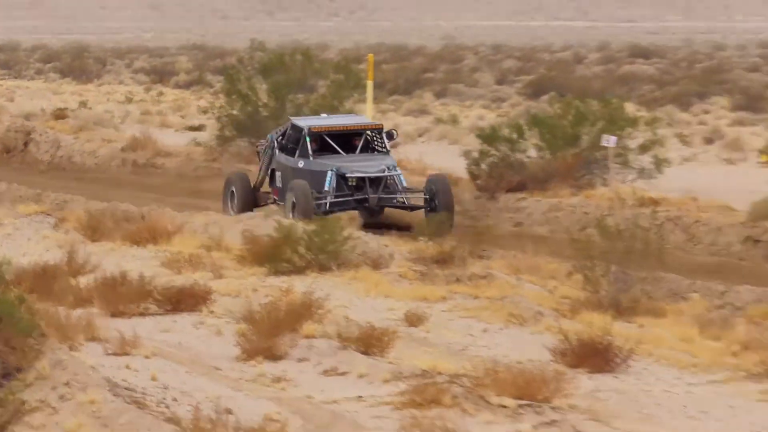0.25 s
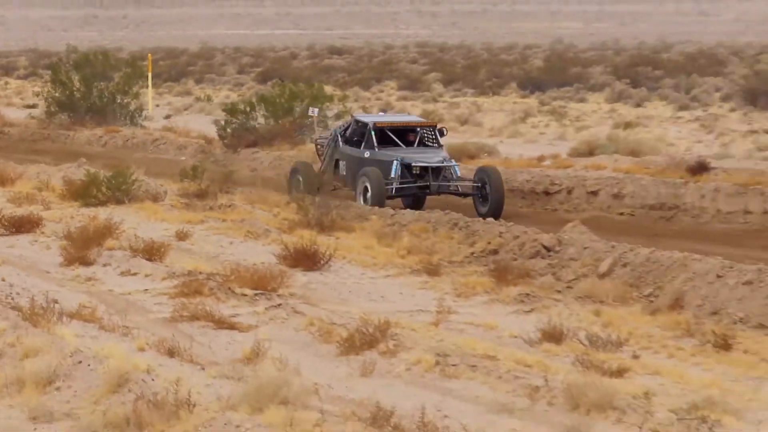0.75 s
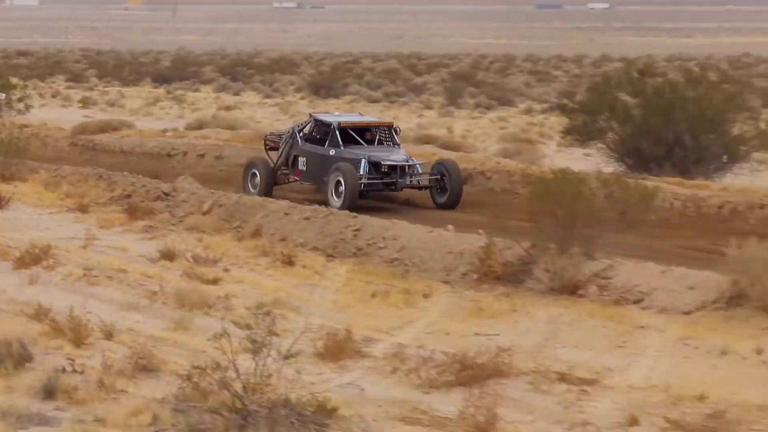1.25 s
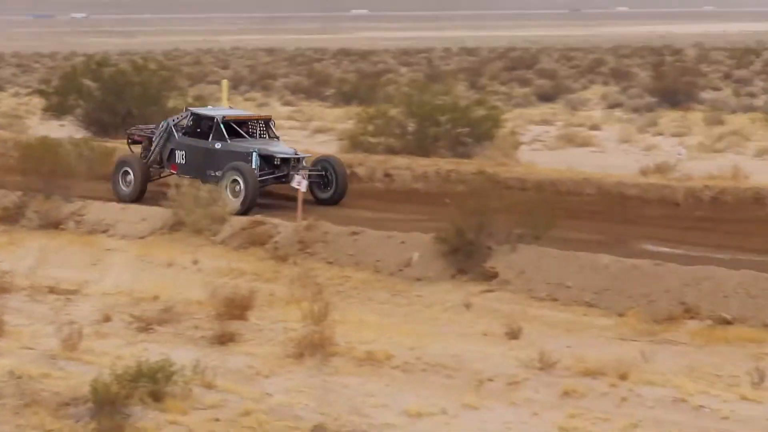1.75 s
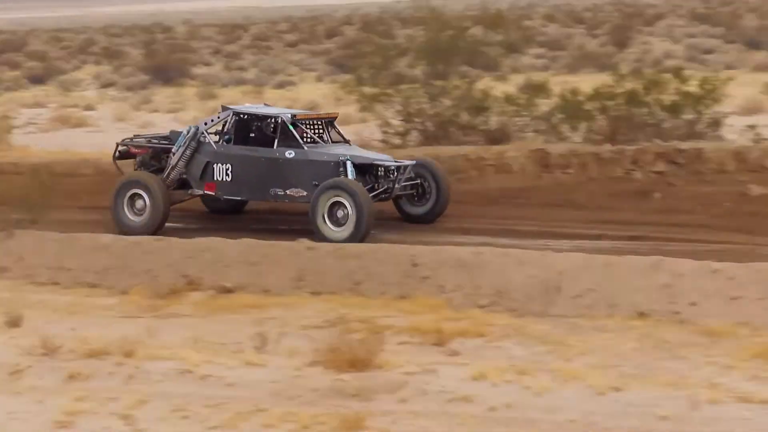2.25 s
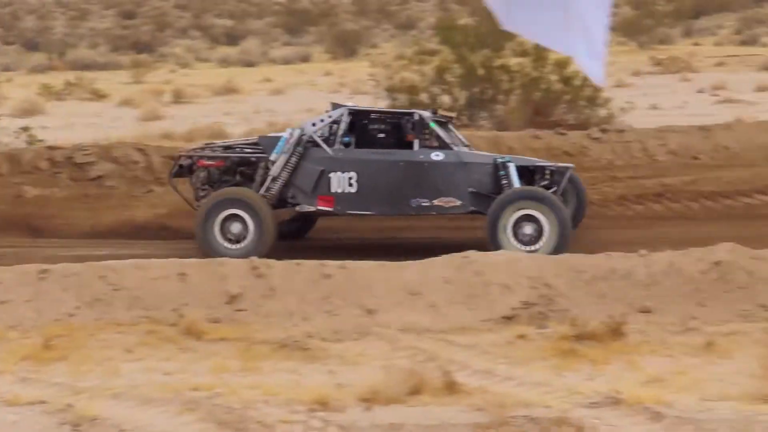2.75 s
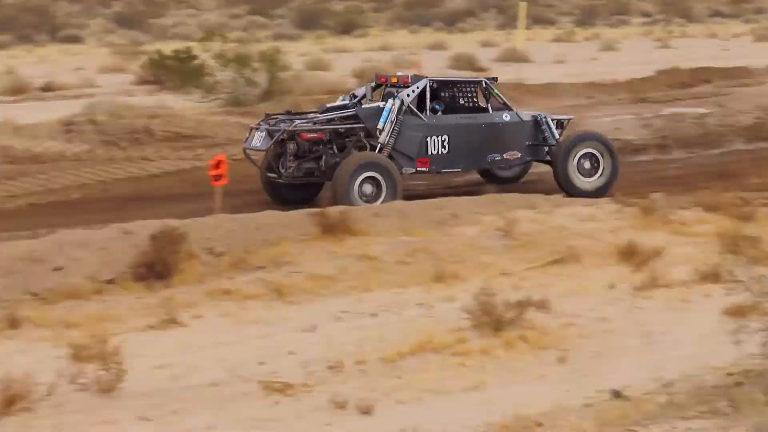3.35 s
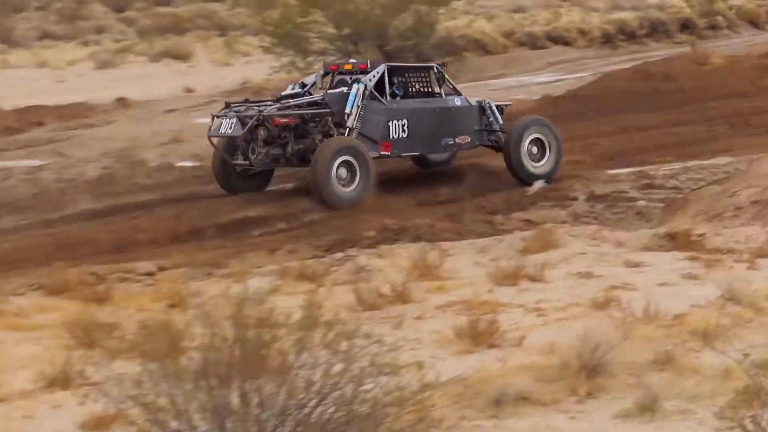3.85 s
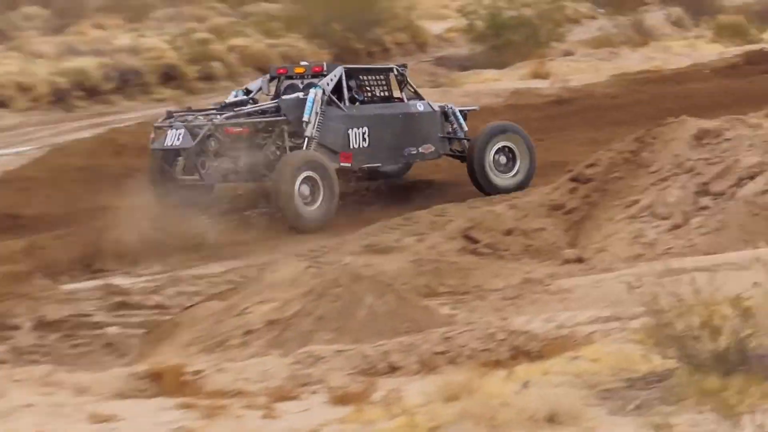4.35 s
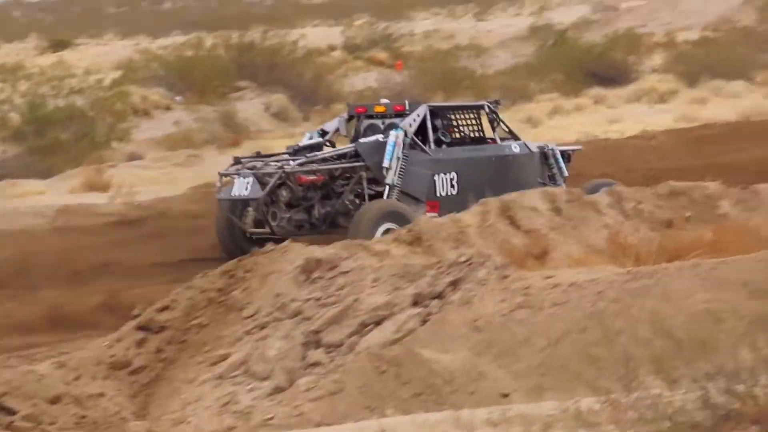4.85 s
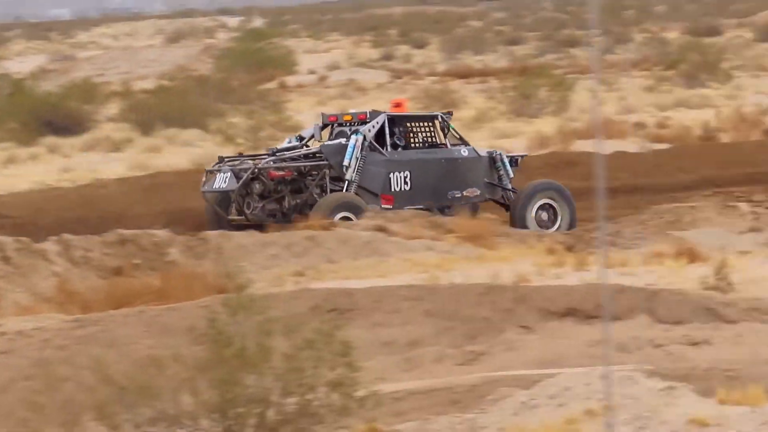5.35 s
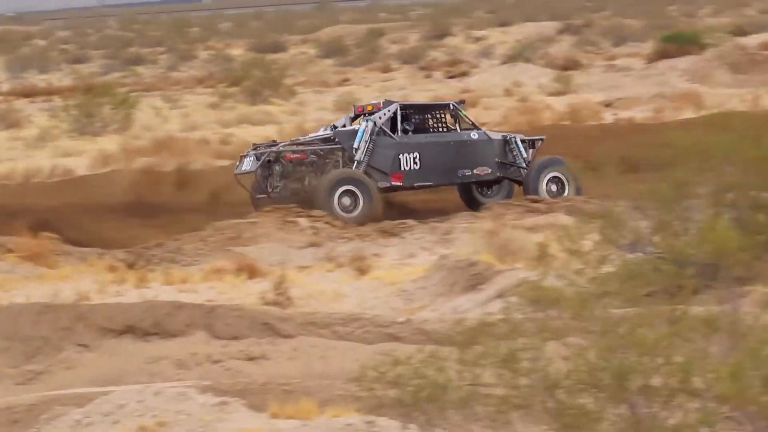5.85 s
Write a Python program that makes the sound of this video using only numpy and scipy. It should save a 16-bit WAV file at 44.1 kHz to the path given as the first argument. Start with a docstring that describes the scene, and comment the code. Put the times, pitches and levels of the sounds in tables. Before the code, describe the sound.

A race buggy's open four-cylinder exhaust, dry and central in open desert, never stops. At 0 s it is a high, hollow, rough drone near 200 Hz, sliding down with small pops at 0.2 and around 0.65-0.85 s. Near 1 s the revs dip and flick upward, and from 1.1 s the bark hardens; sharp pops hit around 1.5 s. From 1.6 to 2.5 s it passes with a steady, loud, uneven buzzing rasp, with low wind buffeting around 2.45 s. Quick lifts gulp the sound at 2.6 and 2.95 s. Revs sag, with thumping pops at 3.35 s and a stuttering crackle burst at 3.6 s, reaching a low growl near 130 Hz at 4 s. After a short cut at 4.35 s, throttle returns strongly, snarling by 4.8 s. It fades and dips at 5.27 s, crackles at 5.55 s, climbs with a rasp to about 5.95 s, then drops slightly and ends mid-run.

```python
"""Race buggy on a desert track

A four-cylinder buggy passes, its driver lifting off and getting back on the throttle. The open exhaust
sings a firing note and its octave, two sines. Clicks at each firing ring pipe resonances and set off
puffs of noise: bark, rasp and crackle, with thumps where the cylinders fire unevenly. Roar, rumble
and wind are shaped noise, and single hard firings pop out after stumbles."""
import sys
import numpy as np
from scipy import signal
from scipy.fft import rfft, irfft
from scipy.io import wavfile
from scipy.ndimage import uniform_filter1d

SR = 44100
rng = np.random.default_rng(int(sys.argv[2]) if len(sys.argv) > 2 else 0)


def persist_wave(psi):
    """Save psi, clipped to +-1, as 16-bit WAV."""
    counts = np.round(np.clip(psi, -1, 1) * 32767).astype(np.int16)
    wavfile.write(sys.argv[1], SR, np.atleast_2d(counts).T)


N = 269010   # length in samples

# Engine speed before bumps: time_s, firings_hz
REVS = [(0, 209), (.3, 202), (.6, 181.5), (.74, 176), (.8, 167), (.99, 161), (1.2, 176), (1.55, 183),
        (1.7, 182), (1.9, 175.5), (2.1, 174.5), (2.57, 165), (2.79, 175.5), (2.9, 171), (3.0, 162.5),
        (3.18, 153.5), (3.4, 150.5), (4.0, 128.3), (4.18, 134.3), (4.4, 134), (4.57, 147.6), (4.69, 149.5),
        (4.83, 172.5), (5.08, 168.5), (5.26, 153), (5.33, 160.5), (5.49, 165.5), (5.84, 180.4),
        (5.98, 190.5), (6.05, 172.6), (6.1, 171.5)]
# A bump unloads or loads the wheels, so the revs flare or sag: peak_s, change_hz, half_length_s
BUMPS = [(1.075, 24, .06), (1.27, -8, .07), (4.91, -11, .055), (5.565, 8, .06)]
# Evenness of running: time_s, turbulent share of pipe tone (0-1), of rasp (0-1), loudest_cylinder_lead_db
RUNNING = [(0, .8, .9, 4), (1.35, .7, .75, 3), (1.6, .25, .5, 3), (1.75, .25, .45, 4), (1.85, .22, .3, 11),
           (2.52, .25, .35, 10), (2.6, .04, .4, 2), (2.95, .04, .4, 2), (3.1, .22, .65, 3),
           (3.6, .4, .7, 4), (3.75, .15, .65, 3), (4.1, .08, .65, 3), (4.45, .06, .55, 3), (4.9, .1, .6, 3),
           (6.1, .07, .38, 1)]
# Share of that lead for each cylinder, in firing order: share (no unit)
CYLINDER_SHARES = [-.3, 1, -.2, 0]
# The driver lifts off for a moment: deepest_s, closing_s, opening_s, note_drop_db, bark_drop_db
LIFTS = [(.97, 0.15, 0.09, 0.5, 16), (1.26, 0.04, 0.045, 1.5, 6.5), (2.588, 0.057, 0.09, 17.5, 13),
         (2.953, .05, 0.092, 15, 14), (4.35, 0.077, 0.11, 19.5, -1.5), (5.271, .1, 0.1, 2, 24.5)]
# Firing note before throttle lifts: time_s, level_db
NOTE = [(0, -19), (.3, -22.5), (.45, -16), (.75, -9), (.85, -12.5), (1.03, -13), (1.2, -10), (1.7, -9),
        (2.55, -10), (2.75, -15), (2.9, -13), (3.23, -20), (3.45, -12.5), (4.08, -17), (4.16, -30),
        (4.3, -21.5), (4.5, -7), (4.8, -14.5), (5.15, -18), (5.25, -22.5), (5.52, -23.5), (5.62, -18.5),
        (5.86, -17), (5.96, -22), (6.1, -19.5)]
# Exhaust rasp under load, before throttle lifts: time_s, rasp_db
BARK = [(0, -47), (.2, -47.5), (.33, -57), (.8, -37), (1.07, -31), (1.45, -29.5), (2.0, -26.5), (2.52, -28),
        (2.7, -36), (2.9, -31.5), (3.1, -40.5), (3.3, -39), (3.37, -34.5), (3.48, -38.5), (3.6, -35),
        (3.9, -40.5), (4.13, -50.5), (4.42, -45), (4.5, -29.5), (4.8, -23.5), (5.0, -33), (5.16, -37.5),
        (5.4, -37), (5.7, -36.5), (5.84, -27.5), (6.1, -43)]
# Colour of the bark as the car swings past, each against the rasp:
# time_s, note_octave_db, pipe_low_db, pipe_middle_db, crackle_db
BEARING = [(0, 0, 1.5, 5.5, -37), (.33, 11, 12, 8, -14.5), (.8, -6, -4, -6.5, -38.5),
           (.95, 8.5, -4, -4, -27), (1.07, -9.5, -9, -7, -31), (1.27, -3, -9.5, -0.5, -29),
           (1.6, -17, -5, -6, -35.5), (2.5, -18, -12, -1, -20.5), (2.58, -5, -0.5, -6, -27.5),
           (2.7, -17.5, -1.5, 16, -23.5), (2.92, -7, 1, 7.5, -26), (3.1, 9, -4, 2, -17.5),
           (3.5, 3.5, 1, -3, -23.5), (3.9, 6.5, 1.5, -2.5, -24), (4.15, -5, 6.5, -8.5, -16.5),
           (4.42, 9.5, 17.5, 0.5, -16), (4.55, 6, 3.5, 2, -36.5), (4.82, -2.5, -4.5, 2, -35),
           (5.2, 1, 9, 5.5, -32.5), (5.7, 6.5, 5.5, 7, -31), (5.86, -5, 5, -2, -23), (6.1, 10, 8.5, 5, -24)]
# Bursts (or one dip) of crackle: peak_s, rise_db, half_length_s
BURSTS = [(0.227, 4, 0.045), (3.373, 9.5, 0.035), (3.556, 17.5, 0.083), (3.678, 11.5, 0.055),
          (4.485, 9.5, 0.026), (4.693, -7, 0.048), (5.543, 17, 0.064), (5.803, 10.5, 0.022)]
# Low end: time_s, uneven_thumps_db (before stumbles), side_wind_db
LOWS = [(0, -31.5, -63), (.9, -30.5, -67), (1.4, -24.5, -56), (1.6, -32.5, -57), (2.1, -37, -54),
        (2.45, -28.5, -29.5), (2.7, -36, -58), (3.2, -30, -77), (3.8, -38.5, -81), (4.45, -33, -71),
        (5.2, -41.5, -71), (5.64, -41.5, -73), (6.1, -47, -77)]
# Single hard firings after a stumble: time_s, crack_db, low_push_db
POPS = [(0.208, -29, -28), (0.648, -35, -30), (0.67, -27, -17), (0.692, -25, -26), (0.828, -21, -29),
        (0.854, -36, -16), (1.138, -19, -21), (1.497, -11, -13), (1.54, -15, -18), (3.33, -19, -12),
        (3.359, -39, -14), (3.383, -18, -9), (3.602, -15, -10), (3.616, -24, -10), (3.631, -18, -16),
        (3.644, -28, -18), (3.659, -27, -13.5), (3.672, -22, -12.5), (4.063, -29, -26), (4.082, -24, -32)]

# Exhaust resonances, levels relative within a bank: centre_hz, width_hz (of each pass), level_db
THUMP_MODES = [(97, 150, -4), (197, 82, 5)]
LOW_MODES = [(551, 170, -2.5), (726, 75, -7)]
MIDDLE_MODES = [(914, 220, 2), (1100, 100, -8)]
RASP_MODES = [(1462, 410, 21.1), (2153, 530, 12.8)]
EDGE_MODES = [(2630, 2350, -1.8), (3500, 920, -0.15)]
CRACKLE_MODES = [(5000, 5000, 9), (7900, 2100, 2), (11400, 16000, -6.5)]
PUSH_MODES = [(188, 78, 0)]

# Relative spectrum of the broad roar: frequency_hz, density_db (per Hz)
ROAR = [(30, -15), (100, -20.5), (250, -20), (900, -9.5), (1600, -17), (3300, -30.5), (9000, -56)]
# Relative spectrum of the roar scattered sideways: frequency_hz, density_db (per Hz)
SCATTER = [(300, -17.5), (900, -11), (2700, -10), (4500, -29.5), (9000, -48.5)]

MUFFLE_HZ = 2587   # low, middle and rasp fall off steeply above
EDGE_DB = -1.5   # 3-4 kHz edge, against the mean of rasp and crackle in dB
CRACKLE_DROPS, PIPE_HOLDS = .44, .48   # shares of a lift's drop: crackle follows, low registers escape
STUMBLE_DB, STUMBLE_S = 7.5, .046   # swell of thumps and rumble around a hard firing, half length
POP_SPIT_DB = -27   # treble spit, against the crack
ROAR_DB, ROAR_FOLLOWS = -38, .4   # roar at mean rasp level; share of the rasp's swing it follows
RUMBLE_DB, RUMBLE_SIDE_DB = -10, -21   # rumble against the thumps; its side part against the rumble
WIDE_DB, SCATTER_DB = -10, -58   # side crackle against the middle; scattered roar at mean loudness
LEFT_DB = .12   # left is raised and right lowered by this much
CUTOFF_HZ = 15700   # the top is 70 dB down from here


def from_db(db):
    """Decibels to an amplitude factor."""
    return 10 ** (np.asarray(db) / 20)


def in_time(rows):
    """Each column of a table as a straight-line curve over the scene."""
    s, *columns = np.transpose(rows)
    return [np.interp(np.arange(N) / SR, s, column) for column in columns]


def swells(rows):
    """Sum of ramps up to a peak and down again, rows of (peak s, rise s, fall s, height)."""
    t = np.arange(N) / SR
    return sum(np.interp(t, [s - rise_s, s, s + fall_s], [0, height, 0])
               for s, rise_s, fall_s, height in rows)


def even(x, span_s=.067):
    """Hold the level near rms 1 over a short span."""
    size = int(span_s * SR)
    power = uniform_filter1d(uniform_filter1d(x ** 2, size=size), size=size)
    return x / np.sqrt(power + 1e-20)


def resonate(x, modes):
    """Parallel resonances run forwards and backwards: steep flanks, all peaking together in one spike."""
    out = 0
    for hz, width_hz, level_db in modes:
        r = np.exp(-np.pi * width_hz / SR)
        b = (1 - r * r) / 2 * np.array([1, 0, -1])
        a = [1, -2 * r * np.cos(2 * np.pi * hz / SR), r * r]
        forward = signal.lfilter(b, a, x + 1e-18)
        out = out + from_db(level_db) * signal.lfilter(b, a, forward[::-1])[::-1]
    return out


def struck(hits, modes):
    """Resonances scaled so that a unit click peaks at 1."""
    unit_ring = resonate(signal.unit_impulse(2000, "mid"), modes)
    return resonate(hits, modes) / np.max(np.abs(unit_ring))


def coloured(spectrum):
    """Noise with the given spectrum, rms 1."""
    hz, level_db = np.transpose(spectrum)
    bins_hz = np.maximum(np.arange(N // 2 + 1) * SR / N, 1)
    gain = from_db(np.interp(np.log(bins_hz), np.log(hz), level_db))
    x = irfft(rfft(rng.standard_normal(N)) * gain, N)
    return x / np.std(x)


def low_noise(low_hz, high_hz):
    """Band of bass noise, evened to rms 1."""
    band = signal.butter(3, [low_hz, high_hz], "band", fs=SR, output="sos")
    return even(signal.sosfilt(band, rng.standard_normal(N)), span_s=.29)


def engine_turns():
    """Running count of firings: engine speed plus bumps, summed over time."""
    bumps_hz = swells([(s, half_s, half_s, hz) for s, hz, half_s in BUMPS])
    return np.cumsum(in_time(REVS)[0] + bumps_hz) / SR


def firings(turns, scatter_db, lead_scale, lag, jitter_s):
    """One suction click per firing: cylinder pattern plus chance, which grows with turbulence; lag in firings."""
    rough, _, lead_db = in_time(RUNNING)
    at = np.flatnonzero(np.diff(np.floor(turns - lag)) > 0)
    chance = rng.standard_normal((1500, 2))[:len(at)]
    cylinder = np.array(CYLINDER_SHARES)[np.arange(len(at)) % 4]
    level_db = lead_scale * lead_db[at] * cylinder + scatter_db * rough[at] * chance[:, 0]
    shifted = at + np.round(jitter_s * SR * rough[at] * chance[:, 1]).astype(int)
    clicks = np.zeros(N)
    clicks[np.clip(shifted, 0, N - 1)] = -from_db(level_db)
    return clicks


def registers():
    """Levels in dB of octave, pipe low, pipe middle, rasp and crackle: load, less lifts, coloured by bearing."""
    lift_db = swells([(s, closing_s, opening_s, db) for s, closing_s, opening_s, _, db in LIFTS])
    rasp_db = in_time(BARK)[0] - lift_db
    octave_db, low_db, middle_db, crackle_db = rasp_db + in_time(BEARING)
    burst_db = swells([(s, half_s, half_s, db) for s, db, half_s in BURSTS])
    crackle_db = crackle_db + (1 - CRACKLE_DROPS) * lift_db + burst_db
    back_db = PIPE_HOLDS * lift_db
    return octave_db + back_db, low_db + back_db, middle_db + back_db / 2, rasp_db, crackle_db


def firing_note(turns, octave_db):
    """The exhaust sings one cycle per firing, with its octave above; levels are rms."""
    note_db = in_time(NOTE)[0] - swells([lift[:4] for lift in LIFTS])
    note = np.sqrt(2) * from_db(note_db) * np.cos(2 * np.pi * turns)
    return note + np.sqrt(2) * from_db(octave_db) * np.cos(4 * np.pi * turns - .6)


def thump_level():
    """Level of the uneven thumps in dB, raised wherever a hard firing is near."""
    near = swells([(s, STUMBLE_S, STUMBLE_S, 1) for s, *_ in POPS])
    return in_time(LOWS)[0] + STUMBLE_DB * np.minimum(near, 1)


def uneven_thumps(turns, thump_db):
    """Differences between cylinders' firings ring the low resonances."""
    uneven = firings(turns, scatter_db=3.5, lead_scale=.13, lag=.92, jitter_s=0)
    # only the departure from the mean firing thumps; the mean is the note itself
    uneven[uneven != 0] -= np.mean(uneven[uneven != 0])
    return from_db(thump_db) * even(resonate(uneven, THUMP_MODES), span_s=.15)


def bark(clicks, modes, puff_s, share):
    """Clean clicks and the turbulent puff of gas after each, through the same resonances; rms about 1."""
    r = np.exp(-1 / (puff_s * SR))
    puffs = signal.lfilter([1], [1, -r], clicks) * rng.standard_normal(N)
    clean = np.sqrt(1 - share) * even(resonate(clicks, modes))
    return clean + np.sqrt(share) * even(resonate(puffs, modes))


def pipe_bark(turns, steady, levels):
    """Each firing barks through the pipe: low, middle and rasp are muffled, the edge above is not."""
    _, low_db, middle_db, rasp_db, crackle_db = levels
    tone_share, rasp_share, _ = in_time(RUNNING)
    sharp = firings(turns, scatter_db=1.5, lead_scale=1, lag=.625, jitter_s=.00005)
    pipe = from_db(low_db) * bark(steady, LOW_MODES, puff_s=.012, share=tone_share)
    pipe += from_db(middle_db) * bark(steady, MIDDLE_MODES, puff_s=.012, share=tone_share)
    pipe += from_db(rasp_db) * bark(sharp, RASP_MODES, puff_s=.007, share=rasp_share)
    pipe = signal.sosfiltfilt(signal.butter(3, MUFFLE_HZ, fs=SR, output="sos"), pipe)
    edge_db = (rasp_db + crackle_db) / 2 + EDGE_DB
    return pipe + from_db(edge_db) * bark(sharp, EDGE_MODES, puff_s=.005, share=.9)


def crackle(turns, crackle_db):
    """Firings of widely scattered strength spit treble; two signals share clicks but not puffs."""
    spits = firings(turns, scatter_db=14, lead_scale=.3, lag=.62, jitter_s=.0002)
    return [from_db(crackle_db) * bark(spits, CRACKLE_MODES, puff_s=.006, share=.95)
            for _ in range(2)]


def roar(rasp_db):
    """Broad roar of shaped noise that partly follows the rasp level."""
    level_db = ROAR_DB + ROAR_FOLLOWS * (rasp_db - rasp_db.mean())
    return from_db(level_db) * coloured(ROAR)


def scattered_roar(middle_db, rasp_db):
    """Faint noise scattered sideways, in step with the pipe middle and rasp."""
    loudness = from_db(middle_db) + from_db(rasp_db)
    return from_db(SCATTER_DB) * loudness / np.mean(loudness) * coloured(SCATTER)


def rumble(thump_db):
    """Bass noise that follows the thumps, with a weaker independent part for the sides."""
    rumble_db = thump_db + RUMBLE_DB
    middle = from_db(rumble_db) * low_noise(low_hz=47.5, high_hz=121)
    return middle, from_db(rumble_db + RUMBLE_SIDE_DB) * low_noise(low_hz=35, high_hz=110)


def wind():
    """Wind buffets the microphone ports: bass noise opposite in left and right."""
    return from_db(in_time(LOWS)[1]) * low_noise(low_hz=45, high_hz=400)


def pops(clicks):
    """A hard firing gives a crack, a spit of treble and, just after the nearest beat, a low push."""
    beats, cracks, pushes = np.flatnonzero(clicks), np.zeros(N), np.zeros(N)
    for s, crack_db, push_db in POPS:
        at = beats[np.argmin(np.abs(beats - s * SR))]
        cracks[int(s * SR)] = -from_db(crack_db)
        pushes[at + 100] = from_db(push_db)   # samples later, its crest joins the crest of the note
    spit = from_db(POP_SPIT_DB) * struck(cracks, CRACKLE_MODES)
    return struck(cracks, MIDDLE_MODES + RASP_MODES) + spit + struck(pushes, PUSH_MODES)


def scene():
    """The car sits in the middle; treble, a faint roar, some rumble and wind spread to the sides."""
    turns, levels, thump_db = engine_turns(), registers(), thump_level()
    octave_db, _, middle_db, rasp_db, crackle_db = levels
    steady = firings(turns, scatter_db=2, lead_scale=.3, lag=.62, jitter_s=.00003)
    crackle_mid, crackle_side = crackle(turns, crackle_db)
    rumble_mid, rumble_side = rumble(thump_db)
    mid = firing_note(turns, octave_db) + uneven_thumps(turns, thump_db)
    mid += pipe_bark(turns, steady, levels) + crackle_mid
    mid += roar(rasp_db) + rumble_mid + pops(steady)
    side = from_db(WIDE_DB) * crackle_side + scattered_roar(middle_db, rasp_db)
    side += wind() + rumble_side
    return np.array([(mid + side) * from_db(LEFT_DB), (mid - side) * from_db(-LEFT_DB)])


def record(dry):
    """The highest peaks are rounded, then the top is cut."""
    rounded = 1.5 * np.tanh(dry / 1.5)
    return signal.sosfilt(signal.cheby2(12, 70, CUTOFF_HZ, fs=SR, output="sos"), rounded)


dry = scene()
out = record(dry)
persist_wave(out)
```